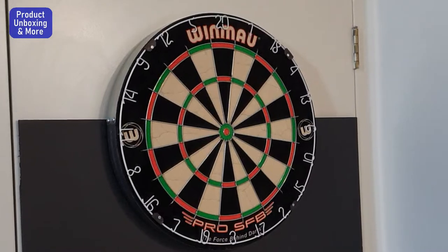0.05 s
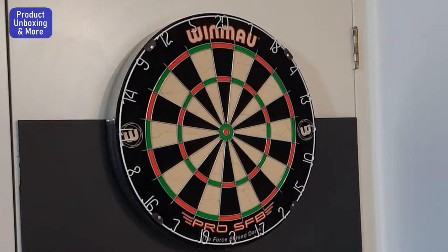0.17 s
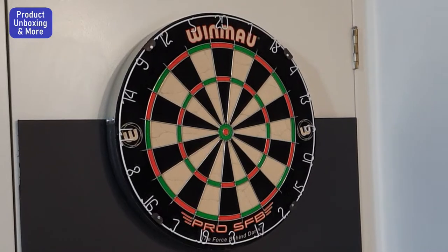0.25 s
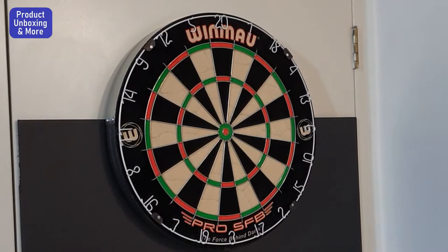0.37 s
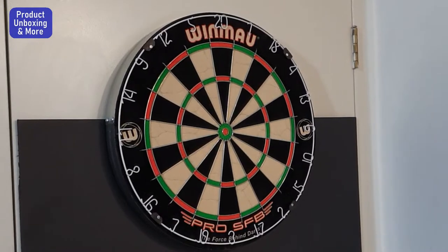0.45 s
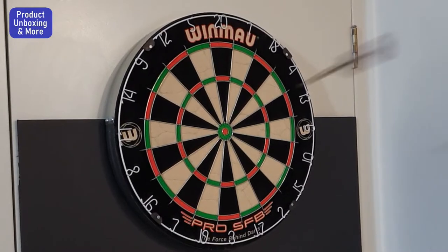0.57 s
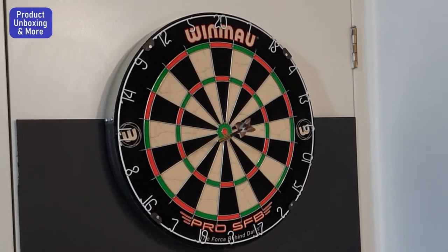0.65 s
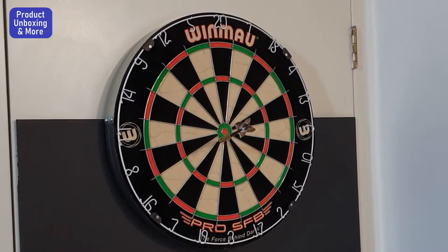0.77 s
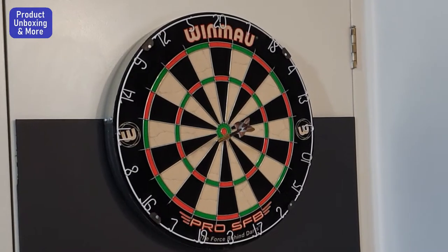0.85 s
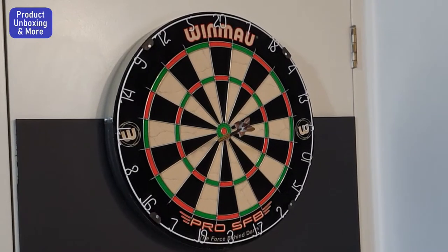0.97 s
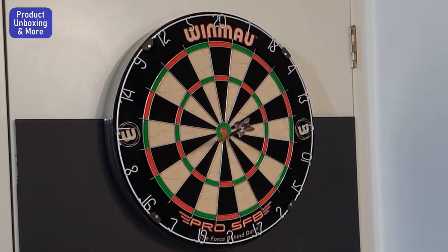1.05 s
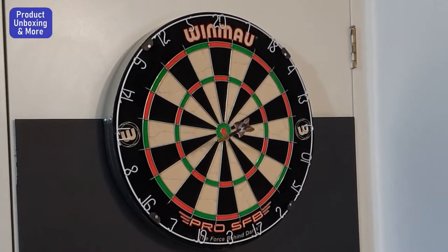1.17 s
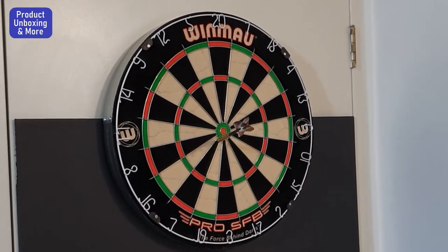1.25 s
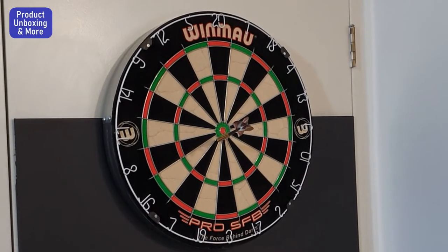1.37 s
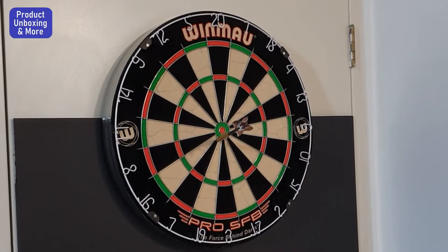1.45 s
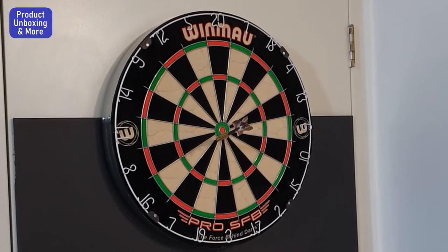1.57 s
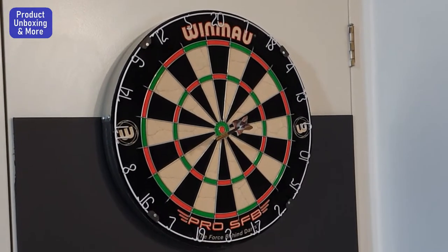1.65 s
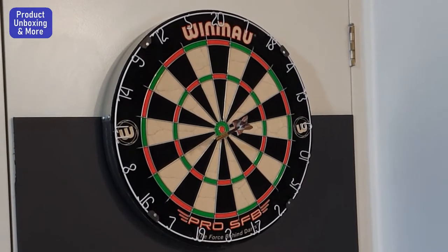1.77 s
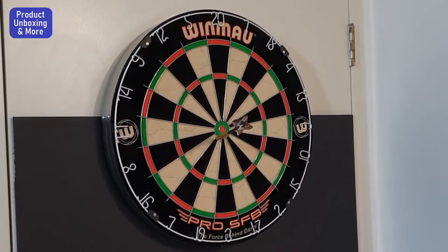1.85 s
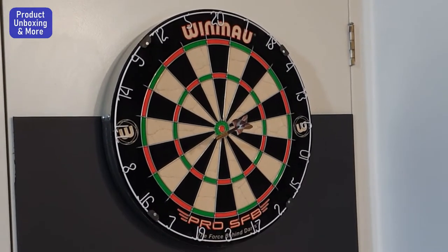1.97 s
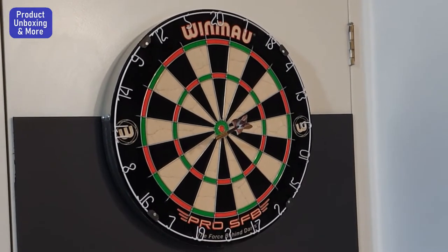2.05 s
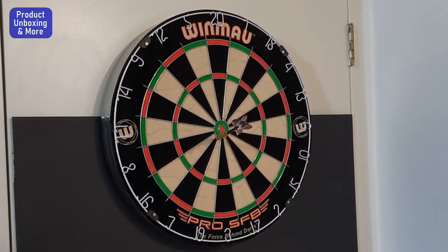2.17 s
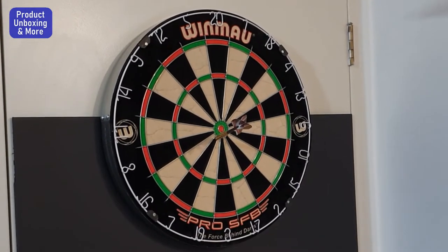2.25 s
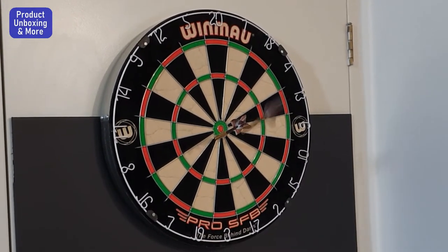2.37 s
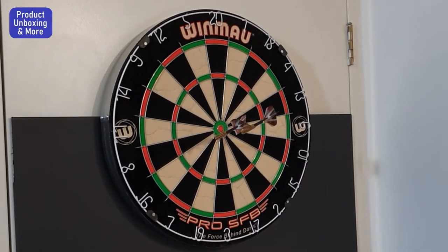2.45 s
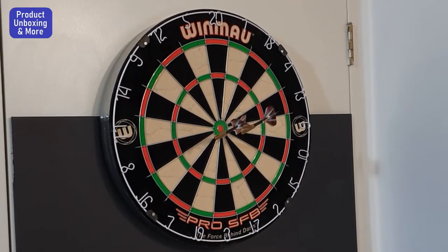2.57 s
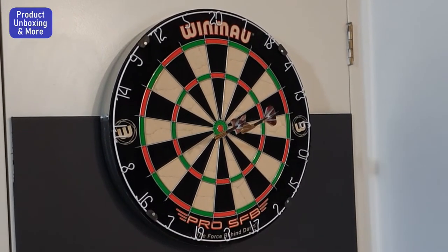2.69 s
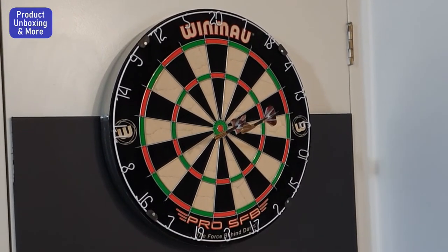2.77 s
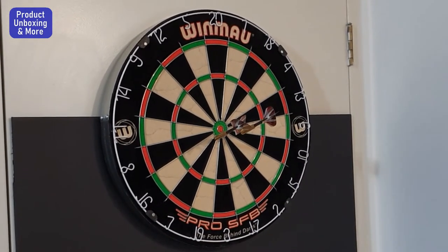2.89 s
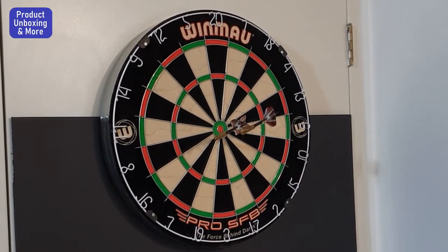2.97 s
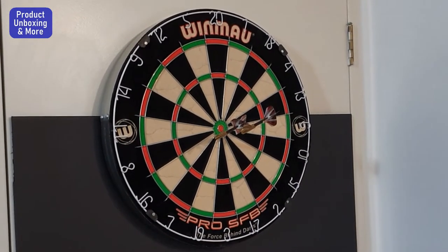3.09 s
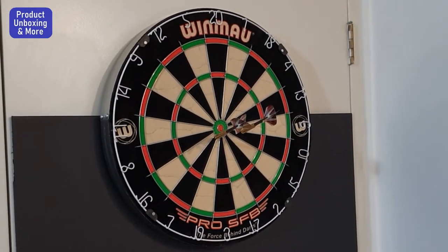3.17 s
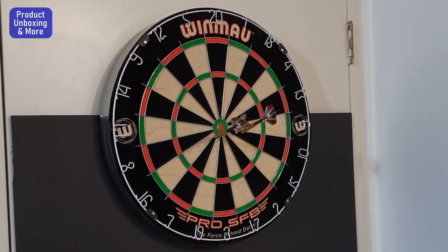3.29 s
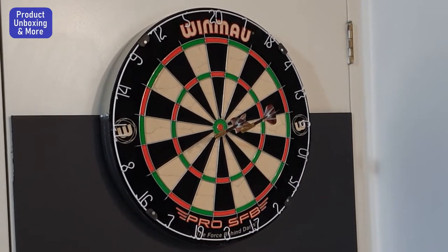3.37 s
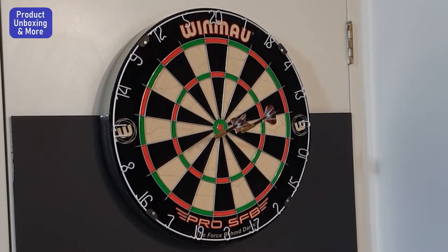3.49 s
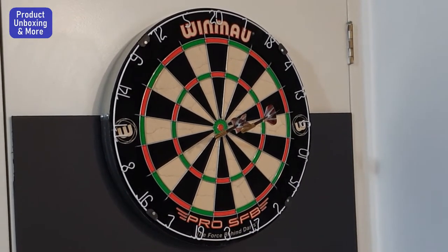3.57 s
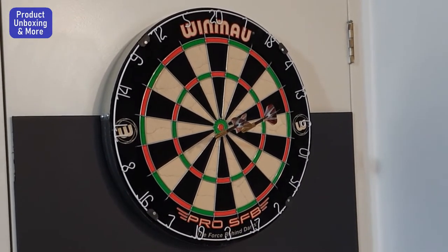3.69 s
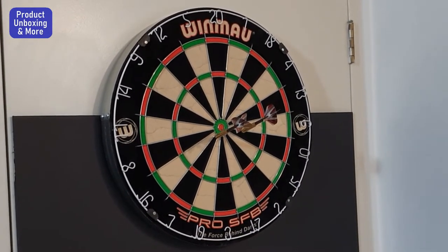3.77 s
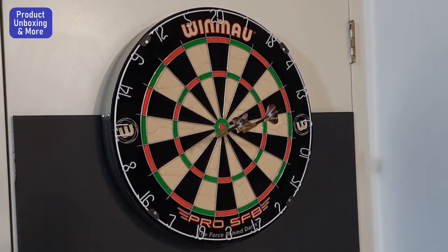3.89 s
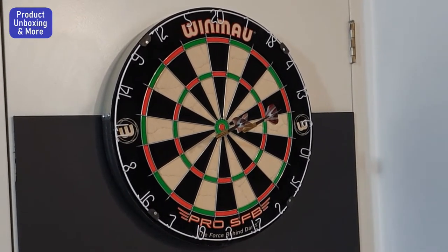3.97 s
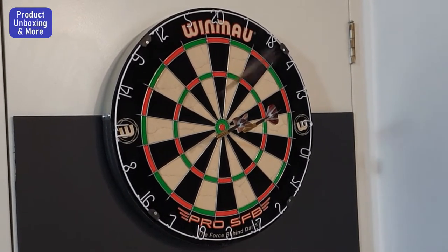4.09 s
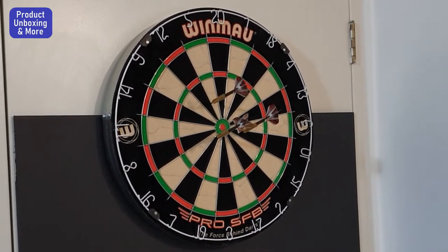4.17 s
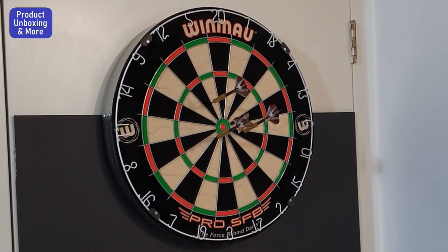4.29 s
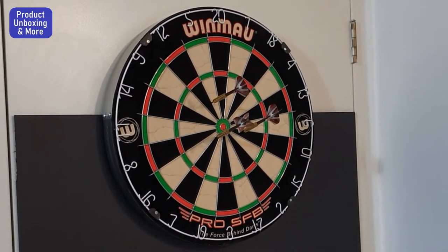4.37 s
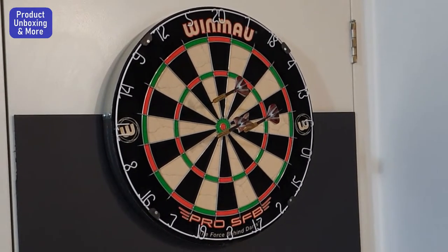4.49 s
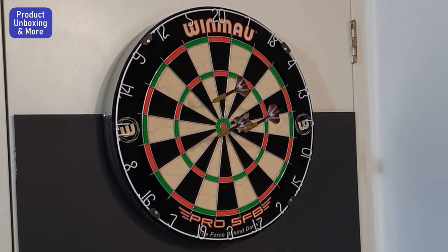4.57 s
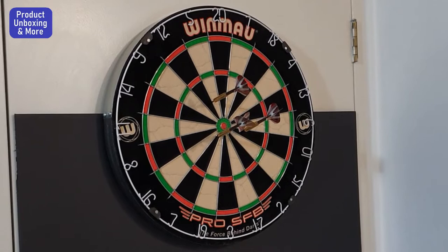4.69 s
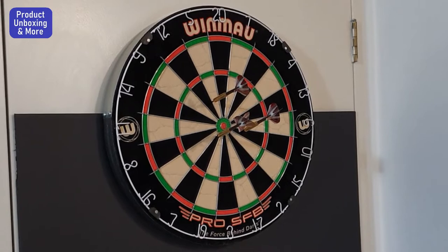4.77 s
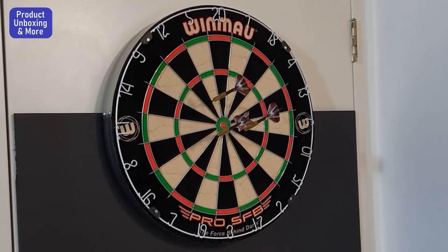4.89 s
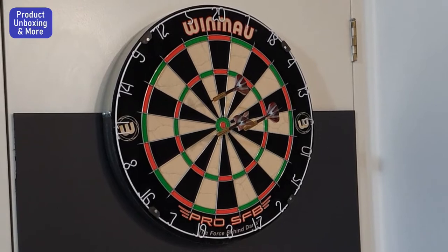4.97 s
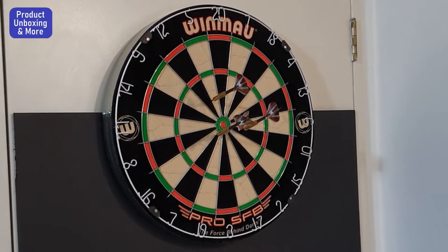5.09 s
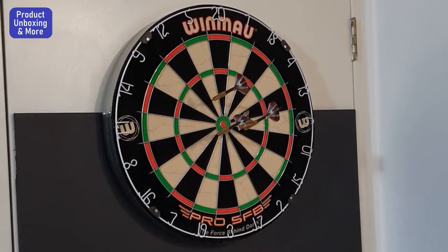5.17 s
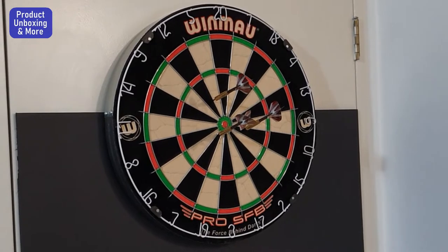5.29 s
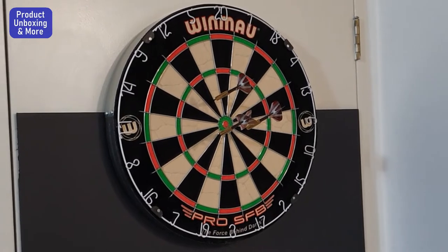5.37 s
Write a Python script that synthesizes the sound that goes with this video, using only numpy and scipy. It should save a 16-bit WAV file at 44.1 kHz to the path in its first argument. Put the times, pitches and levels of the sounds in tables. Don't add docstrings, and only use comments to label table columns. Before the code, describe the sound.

In a small humming room, three spaced dart strikes knock a door-mounted board, with faint sleeve rustles and shoe scuffs between them.

```python
import sys
import numpy as np
from scipy import signal
from scipy.fft import rfft, irfft
from scipy.io import wavfile
from scipy.ndimage import uniform_filter1d

SR = 44100
rng = np.random.default_rng(int(sys.argv[2]) if len(sys.argv) > 2 else 0)


def dump(signal):
    limited = np.clip(np.atleast_2d(signal).T, -1, 1)
    pcm = np.round(limited * 32767).astype(np.int16)
    wavfile.write(sys.argv[1], SR, pcm)


def invert_db(x):
    u = np.asarray(x, float) / 20
    return 10 ** u


N = 239806


def evened(x):
    return x / np.sqrt(np.mean(x ** 2) + 1e-20)


def read(points, hz):
    f, value = np.transpose(points)
    return np.interp(np.log(hz + 1), np.log(f + 1), value)


def resonate(x, hz, width):
    turn = np.exp(2j * np.pi * np.cumsum(hz * np.ones(x.shape[-1])) / SR)
    r = np.exp(-np.pi * width / SR)
    return 2 * (turn * signal.lfilter([1 - r], [1, -r], x / turn)).real


def whitened(x, bins):
    z = rfft(x)
    z = z / np.sqrt(uniform_filter1d(abs(z) ** 2, round(bins), -1) + 1e-20)
    return irfft(z, x.shape[-1]) * np.linalg.norm(x[0])


def causal(colour):
    hz = abs(np.fft.fftfreq(SR // 2, 1 / SR))
    log_gain = np.log(invert_db(np.maximum(read(colour, hz), -100)))
    click = np.fft.ifft(np.exp(log_gain - 1j * signal.hilbert(log_gain).imag)).real
    return click / abs(click).max()


# frequency in Hz, likeness from 0 to 1.
PORT_LIKENESS = [(100, 1), (200, .97), (450, .88), (850, .55), (1700, .33), (3500, .1), (8000, .06)]


def ports(a, b, hz, lead, tilt):
    same = np.clip(read(PORT_LIKENESS, hz), 0, 1)
    lean = invert_db(read(tilt, hz) / 2)
    mixed = same * a + np.sqrt(1 - same ** 2) * b
    right = mixed * np.exp(-2j * np.pi * hz * lead / SR)
    return np.array([a * lean, right / lean])


# frequency in Hz, left over right in dB.
NOISE_TILT = [(60, 5), (180, 1.5), (550, 4), (1650, -2), (4970, 8.5), (15000, 14.5)]


def noise(colour, patchy_db, size=512):
    hz = np.fft.rfftfreq(size, 1 / SR)
    a, b, c, d, patches = rng.standard_normal((4 * N // size + 5, len(hz), 5)).T
    patches = uniform_filter1d(patches, size // 64, 0)
    patches = evened(uniform_filter1d(patches, 8192 // size, 1))
    z = ports(a + 1j * b, c + 1j * d, hz[:, None], 13.2, NOISE_TILT)
    z = z * invert_db(read(colour, hz)[:, None] + patchy_db * patches)
    return evened(signal.istft(z, nperseg=size, noverlap=3 * size // 4)[1][:, :N])


# frequency in Hz, level in dB per Hz.
ROOM_TONE = [(20, -36.5), (45, -9), (85, -12), (118, -23), (187, -25), (308, -21.5), (408, -26.5),
             (637, -24.5), (797, -37.5), (1210, -36), (1650, -45), (7440, -59.5), (12000, -62),
             (15800, -78)]
# frequency in Hz, width in Hz, level in dB.
FAN_BANDS = [(5100, 560, -84.5), (1220, 25, -77.5), (654, 34, -71.5), (335.6, 6.8, -71), (150.7, 4.7, -68),
             (62.3, 10, -56.5)]


def air():
    flat = noise([(100, 0.0054), (9000, 0)], 0.3, size=1024)
    bands = np.zeros((2, N))
    for hz, width, db in FAN_BANDS:
        bands += invert_db(db) * evened(resonate(resonate(flat, hz, width), hz, width))
    return invert_db(-52.5) * noise(ROOM_TONE, 3.5, size=2048) + bands


# time in seconds, level in dB.
HUM_LEVEL = [(0, -105), (.04, -59.5), (.15, -56), (.2, -46), (.6, -48), (1.1, -50.5), (1.3, -41.5),
             (1.4, -49.5), (1.58, -43), (1.9, -53.5), (2.3, -49.5), (2.45, -44), (3.05, -51.5),
             (3.7, -46.5), (4.2, -49.5), (4.7, -46.5), (5.12, -46.5), (5.44, -59)]


def hum(hum_hz=99.7, waver_hz=1.2, lag=16):
    waver = uniform_filter1d(rng.standard_normal(N), size=4000)
    waver = evened(uniform_filter1d(waver, size=4000))
    turns = np.cumsum(hum_hz + waver_hz * waver) / SR
    fuzz = evened(resonate(resonate(rng.standard_normal(N), 92, 12), 92, 12))
    level = invert_db(np.interp(np.arange(N) / SR, *np.transpose(HUM_LEVEL)))
    tone = level * (np.sqrt(2) * np.sin(2 * np.pi * turns) + 0.3 * fuzz)
    return np.array([tone, np.roll(tone, lag)])


def bumps(rows):
    t, out = np.arange(N) / SR, np.zeros((2, N))
    slow_fall, drop_db = 1.59, -21
    for s, spread, *db in rows:
        away = np.maximum(s - t, (t - s) / slow_fall) / spread
        out += invert_db(db)[:, None] * invert_db(drop_db * np.minimum(away, 5) ** 1.2)
    return out


# peak in seconds, spread in seconds, board level in dB, scrape level in dB.
SHOE_SCUFFS = [
    (3.208, .022, -50, -64),
    (3.24, .05, -48, -67),
    (5.1, .025, -68, -50),
    (5.145, 0.055, -43, -49),
    (5.2, .06, -50, -67),
    (5.39, 0.063, -65, -57),
]


def scuffs():
    slips = noise([(150, -5.5), (320, 1.0), (600, 2.5), (1200, 5.5), (1700, -9.5), (2400, -58), (4000, -52)], 1.1)
    slips *= invert_db(evened(uniform_filter1d(rng.standard_normal(N), 300)))
    board, scrape = bumps(SHOE_SCUFFS)
    return board * evened(resonate(slips, 530, 24)) + scrape * slips


# start in seconds, length in seconds, level in dB, frequency in Hz, width in Hz.
FINGER_RUBS = [(0.111, 0.15, -66, 2780, 700), (0.125, 0.094, -74.5, 5500, 900),
               (1.564, 0.11, -58.5, 1900, 160), (1.565, 0.1, -65.5, 3150, 300), (2.073, .1, -67, 2100, 400),
               (2.1, .07, -74, 7230, 200), (2.9, 0.14, -72, 2560, 260), (3.121, 0.088, -73, 2800, 200),
               (1.458, 0.011, -69, 1200, 900), (3.828, 0.018, -79, 900, 700),
               (3.896, .014, -65.5, 1183, 900), (1.133, 0.039, -72, 4940, 900)]


def fingers():
    rub, out = noise([(500, 0), (9000, 0)], 1.5, size=256), np.zeros((2, N))
    for s, length, db, hz, width in FINGER_RUBS:
        part = slice(round(s * SR), round((s + length) * SR))
        band = evened(resonate(resonate(rub[:, part], hz, width), hz, 2 * width))
        out[:, part] += invert_db(db) * np.sin(np.linspace(0, np.pi, band.shape[1])) * band
    return out


# start in seconds, peak in seconds, end in seconds,
# swish level in dB, rustle level in dB.
ARM_SWINGS = [
    (0.458, .658, 0.76, -62, -56.5),
    (2.248, 2.37, 2.47, -64.5, -63),
    (3.916, 4.108, 4.23, -62.5, -52.5),
]


def swings():
    t, out = np.arange(N) / SR, np.zeros((2, N))
    edge_s = 0.05
    weaker_db = np.c_[[-6.5, -16.5]]
    for start, peak, end, *db in ARM_SWINGS:
        away = np.interp(t, [start, peak, end], [1, 0, 1])
        edge = np.clip(np.minimum(t - start, end - t) / edge_s + .5, 0, 1)
        out += edge * invert_db(np.c_[db] + weaker_db * away)
    return out


# frequency in Hz, level in dB per Hz.
SWISH_COLOUR = [(1760, -18), (3000, 2), (3830, -7), (4580, -7.5), (6220, -5.5), (7510, -13), (9250, -5.5),
                (10500, -16.5), (13800, -14.5), (15800, -25.5)]
# frequency in Hz, level in dB per Hz.
RUSTLE_COLOUR = [(410, -31.5), (700, 0.5), (785, -8), (874, 1), (1190, -1.5), (1360, 1.5), (2230, -4),
                 (5000, -35.5), (6500, -56.5), (11000, -120)]
# peak in seconds, spread in seconds, swish level in dB, rustle level in dB.
SLEEVE_SHIFTS = [(.13, 0.094, -82, -76.5), (.3, 0.19, -80.5, -70.5), (1.05, 0.063, -72, -72.5),
                 (1.19, 0.13, -74.5, -64), (1.625, 0.098, -64.5, -58), (1.78, 0.071, -83, -56.5),
                 (2.01, 0.072, -94.5, -64.5), (2.14, 0.15, -69, -63.5), (2.86, 0.09, -78.5, -72.5),
                 (2.96, 0.14, -82.5, -70.5), (3.226, 0.09, -78, -64.5), (3.43, 0.071, -93, -55.5),
                 (3.54, 0.15, -76.5, -72), (3.77, .05, -93.5, -74), (3.97, .05, -70.5, -75),
                 (4.56, 0.19, -68.5, -60.5), (4.775, 0.06, -68, -67), (4.84, 0.122, -91, -67),
                 (5.03, 0.03, -100, -70), (5.14, 0.086, -92, -55), (5.41, 0.065, -76.5, -60)]


def cloth():
    swish = noise(SWISH_COLOUR, 1.2, size=256)
    rustle = noise(RUSTLE_COLOUR, 1.8, size=256)
    bright, dull = swings() + bumps(SLEEVE_SHIFTS)
    return bright * swish + dull * rustle


# frequency in Hz, rise time in seconds.
PANEL_MODES = [(63, 0.01), (79, .012), (105, 0.0068)]
# start in seconds,
# level in dB of the low, the middle and the high mode, time to fall by 60 dB in seconds.
DOOR_KNOCKS = [
    (0.761, -24.5, -31.5, -28.5, 0.26),
    (.826, -26, -33, -30.5, 0.38),
    (2.501, -24, -29, -27, 0.28),
    (2.582, -25.5, -29, -28, 0.2),
    (4.25, -33.5, -38, -30.5, 0.17),
    (4.267, -25, -34, -44, 0.25),
    (4.298, -42.5, -37, -28, 0.17),
    (4.329, -24, -28, -30, .12),
]


def door():
    t, out = np.arange(SR // 2) / SR, np.zeros(N)
    for mode, (hz, rise) in enumerate(PANEL_MODES):
        loose = evened(resonate(resonate(rng.standard_normal(N), hz, 30), hz, 45))
        swell = np.sin(np.pi / 2 * np.minimum(t / rise, 1)) ** 2
        for s, *db, t60 in DOOR_KNOCKS:
            part = slice(round(s * SR), round(s * SR) + len(t))
            swing = np.sqrt(2) * np.sin(2 * np.pi * hz * t) + 0.3 * loose[part]
            out[part] += invert_db(db[mode] - 60 * t / t60) * swell * swing
    return out


# frequency in Hz, time to fall by 60 dB in seconds.
ROOM_DECAY = [(130, 0.41), (340, 0.34), (910, 0.32), (2400, 0.3), (6300, 0.28), (12000, 0.25)]


def room(build_s=.008):
    taps = rng.standard_normal((2, SR // 2)) * (rng.random((2, SR // 2)) < .4)
    hz, t, z = signal.stft(taps, SR, nperseg=256)
    z = z * invert_db(-60 * t / read(ROOM_DECAY, hz)[:, None])
    tail = signal.istft(z, SR, nperseg=256)[1][:, :SR // 2]
    tail *= np.clip(np.arange(SR // 2) / SR / build_s, 0, 1)
    return tail / np.linalg.norm(tail[0])


# frequency in Hz, left over right in dB.
BOARD_BALANCE = [(60, 0), (200, 1), (450, 2), (900, 1.5), (1700, 0), (3400, -3), (7000, 4), (12000, 2.5)]


def dart(blows, colour, tail, rings, mix, crunch_s=0.0022, smear_s=0.014):
    thud_db, room_db, smear_db, ring_db = mix
    lead_in = 1024
    start, t = round(blows[0][0] * SR) - lead_in, np.arange(SR // 2) / SR
    hz = np.fft.rfftfreq(len(t), 1 / SR)

    force, fronts = np.zeros((2, SR // 2))
    for k, (s, db) in enumerate(blows):
        after = t - s + start / SR
        force += invert_db(db) * np.exp(-np.maximum(after, 0) / crunch_s) * (after > -1 / SR)
        fronts[round(s * SR) - start] = (-1) ** k * invert_db(db)
    crunch = .22 * force * rng.standard_normal((2, len(t)))
    contacts = whitened(fronts + crunch, 200) * (force > 0)

    ring = np.zeros(len(t))
    for f, db, t60 in rings:
        ring += invert_db(db - 60 * t / min(t60, .3)) * np.sin(2 * np.pi * f * t)
    body = causal(colour) + invert_db(ring_db) * ring / abs(ring).max()

    swell = np.exp(np.minimum(t - lead_in / SR, 0) / smear_s) * (t < 1040 / SR)
    smear = rng.standard_normal((2, len(t))) * swell
    echoes = np.roll(whitened(room(), 40), lead_in, axis=1)

    layers = [(contacts, body, thud_db, slice(1024, 1550)),
              (echoes, causal(tail), room_db, slice(1730, 5700)),
              (smear, causal(tail), smear_db, slice(800, 1024))]
    top_cut = 1 + (hz / 15400) ** 40
    out = np.zeros((2, N))
    for drive, shape, db, span in layers:
        left, right = rfft(drive) * rfft(shape)
        pair = irfft(ports(left, right, hz, 4, BOARD_BALANCE) / top_cut, len(t))
        pair = pair / pair[:, span].mean(0).std() * signal.windows.tukey(len(t), .02)
        out[:, start:start + len(t)] += invert_db(db) * pair
    return out


# time in seconds, peak in dB.
STRIKE_CONTACTS = [
    [(.7638, 9), (.7654, -5), (.7671, 0), (.7698, -10.5)],
    [(2.5066, 9.5), (2.5081, -0.5), (2.5101, 3.5), (2.512, -20)],
    [(4.2492, -8), (4.2513, -3.5), (4.2531, 2), (4.2571, -11.5)],
]
# frequency in Hz, level in dB per Hz.
STRIKE_COLOURS = [
    [(88, -30), (150, -12.5), (661, -4), (883, -38.5), (1090, -1), (2230, -2), (3540, -19.5), (3890, -16.5),
     (5400, -41.5), (8750, -33), (11900, -58.5), (12600, -99.5), (15000, -89)],
    [(88, -49), (150, -7), (378, -6), (883, -2), (1130, -15), (1460, 2), (1870, -20.5), (2360, -8.5),
     (3400, -14.5), (3970, -35), (9450, -50.5), (13600, -65), (15000, -86)],
    [(88, -45.5), (150, -22), (468, -24), (1570, -0.5), (2020, -5.5), (3030, -4), (5000, -14),
     (5300, -13.5), (5720, -21), (7940, -24.5), (8750, -22), (13600, -24), (15000, -31.5)],
]
# frequency in Hz, level in dB per Hz.
ROOM_COLOURS = [
    [(90, -42.5), (150, -1.5), (261, -4), (359, -1.5), (500, -14.5), (627, -1), (750, -15.5), (1200, -6.5),
     (1800, -10.5), (2290, -7), (3000, -21), (4200, -32), (9000, -49), (15200, -60.5)],
    [(90, -32), (140, 5.5), (206, -12.5), (338, -1), (480, -15.5), (653, -7.5), (750, -16), (898, -10.5),
     (1570, -10.5), (2000, -18), (2500, -18.5), (3600, -27), (5000, -38.5), (15200, -60)],
    [(90, -36), (150, -9), (338, -2), (480, -9), (900, -8), (1170, -12.5), (1400, -6), (1600, -4),
     (2000, -14), (2290, -5.5), (3300, -12.5), (7600, -24.5), (9100, -19.5), (15200, -34.5)],
]
# frequency in Hz, level in dB, time to fall by 60 dB in seconds.
STRIKE_RINGS = [
    [(342, 9.5, 0.12), (622, 7, 0.11), (1100, -12, 0.079), (1285, -11.5, .07), (1900, -11.5, .05),
     (2286, -5, 0.12), (2733, -33.5, .05)],
    [(325, 2.5, 0.16), (645, 1.5, 0.12), (900, 0.5, .09), (1310, -11, 0.056), (1480, -3, 0.079),
     (2300, -3.5, 0.089), (3014, -11, 0.036)],
    [(363, -9.5, 0.13), (1183, 7.5, 0.1), (1330, -9.5, .07), (1616, 11, 0.2), (1822, -7, 0.05),
     (2280, -8, .08), (3150, -8.5, .05)],
]
# thud level in dB, room level in dB, level in dB of the noise just ahead,
# share of ringing in dB.
STRIKE_LEVELS = [
    (-23.5, -29.5, -51.5, -22.5),
    (-18.5, -28.5, -45.5, -14),
    (-18, -32, -40.5, -13.5),
]


def darts():
    strikes = zip(STRIKE_CONTACTS, STRIKE_COLOURS, ROOM_COLOURS, STRIKE_RINGS, STRIKE_LEVELS)
    return sum(dart(*strike) for strike in strikes)


def scene():
    fade = np.clip(np.arange(N) / SR / 0.25, 0, 1) ** 2
    return fade * air() + hum() + scuffs() + fingers() + cloth() + door() + darts()


def hide_faint_treble(z, hz):
    mask_db, mask_slope, mask_hz = -91, 1.4, 9500
    line_db = 10 * np.log10(abs(z) ** 2 + 1e-20)
    loud_db = 10 * np.log10((abs(z) ** 2).sum(1).mean(0) + 1e-20)
    hidden = np.clip((mask_db + mask_slope * (loud_db + 25) - line_db) / 2, 0, 1)
    hidden = hidden * np.clip(hz / mask_hz - .5, 0, 1)[:, None] ** 2
    return z * invert_db(-40 * hidden)


# band edge in Hz, threshold
# in dB.
FLICKER_BANDS = [(7000, -93), (10000, -87), (15000, -105), (16000, 0)]


def flicker_treble(z, hz, t, depth_db=-18, flutter_db=4, phase=0.14, hole=1.0):
    restless = np.sin(2 * np.pi * (6.1 * t + phase)) + .5 * rng.standard_normal(len(t))
    for (lo_hz, gate_db), (hi_hz, _) in zip(FLICKER_BANDS, FLICKER_BANDS[1:]):
        band = (hz >= lo_hz) & (hz < hi_hz)
        power = abs(z[:, band]) ** 2
        level_db = 10 * np.log10(power.sum(1).mean(0) + 1e-20) + flutter_db * restless
        around = uniform_filter1d(power, size=25, axis=1).clip(1e-20)
        strong = np.clip(power / around / hole, 0, 1) ** 2
        z[:, band] *= strong * invert_db(depth_db * np.clip((gate_db - level_db) / 2, 0, 1))
    return z


def band_limit(x):
    return signal.sosfilt(signal.butter(12, 15980, fs=SR, output="sos"), x)


def record(dry):
    hz, t, z = signal.stft(dry, SR, nperseg=2048, noverlap=1024)
    z *= 1 / np.sqrt(1 + (42 / (hz[:, None] + 1)) ** 4)
    z = flicker_treble(hide_faint_treble(z, hz), hz, t)
    gated = signal.istft(z, SR, nperseg=2048, noverlap=1024)[1][:, :N]
    return band_limit(gated)


dry = scene()
out = record(dry)
dump(out)
```